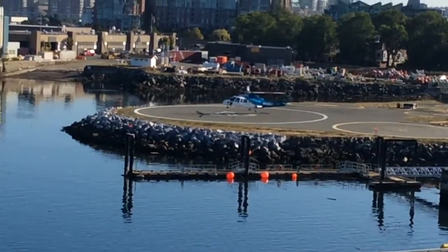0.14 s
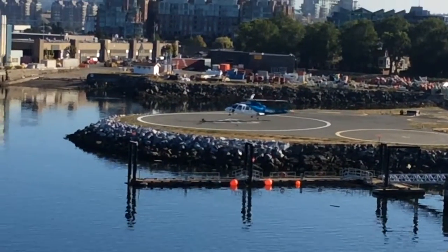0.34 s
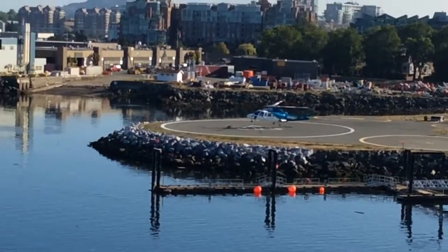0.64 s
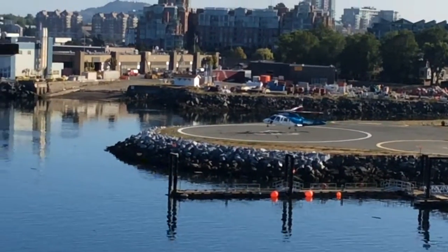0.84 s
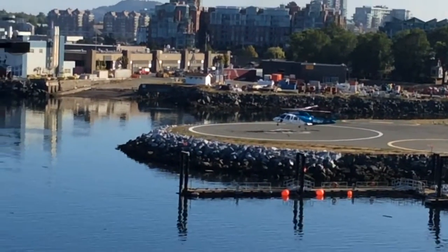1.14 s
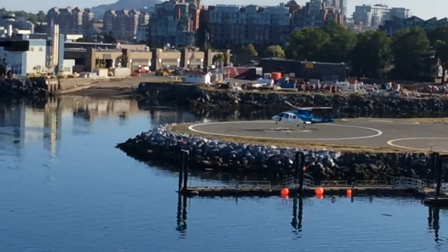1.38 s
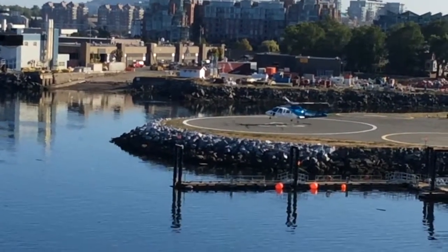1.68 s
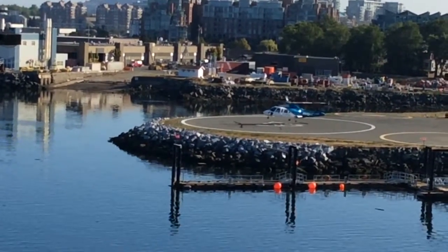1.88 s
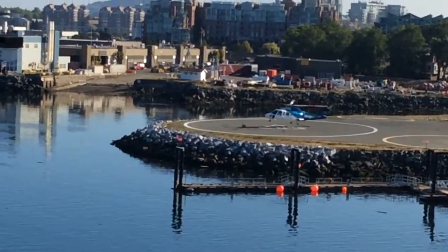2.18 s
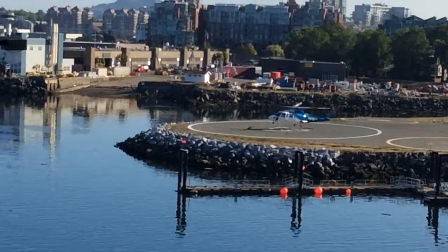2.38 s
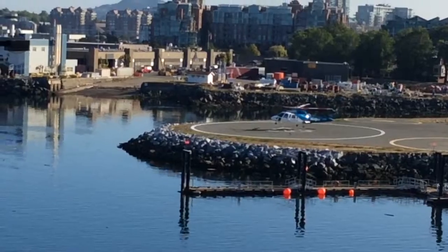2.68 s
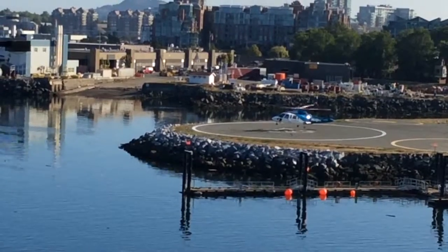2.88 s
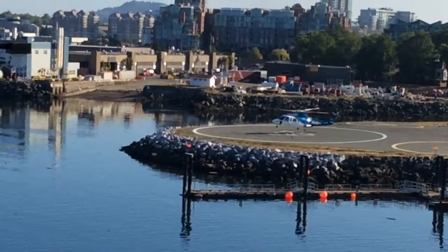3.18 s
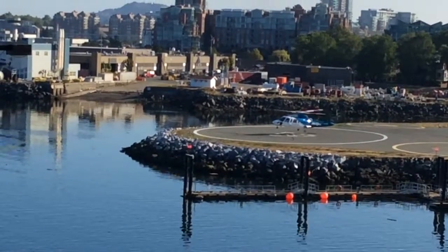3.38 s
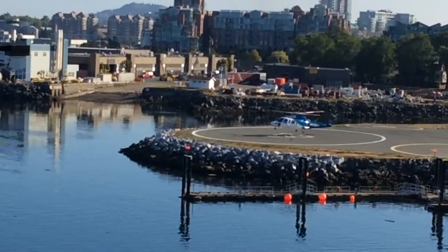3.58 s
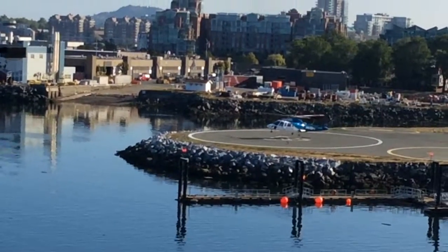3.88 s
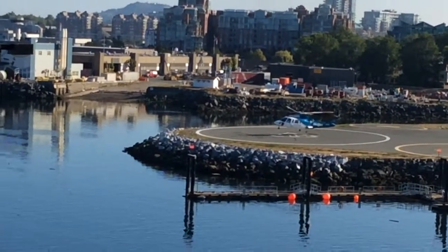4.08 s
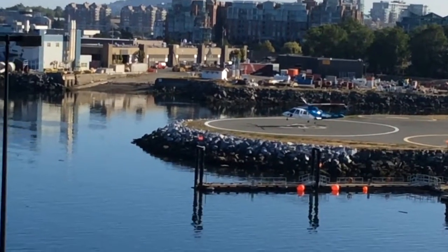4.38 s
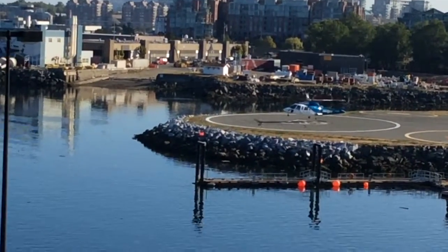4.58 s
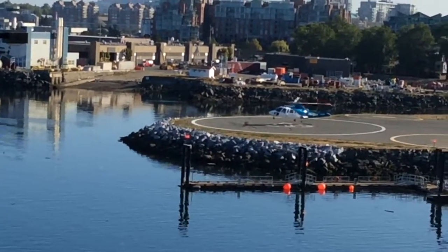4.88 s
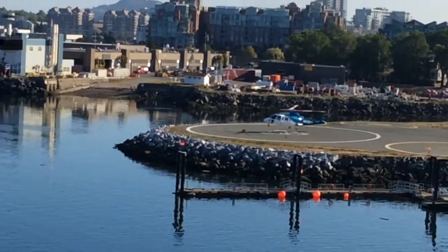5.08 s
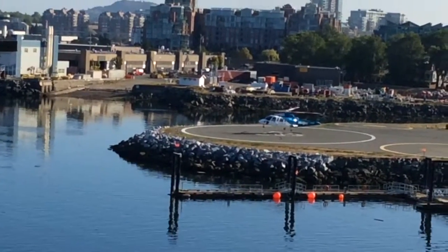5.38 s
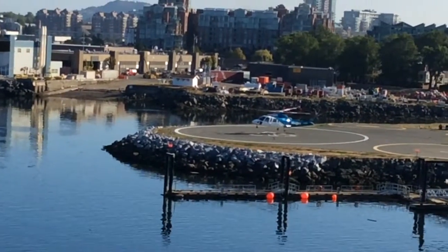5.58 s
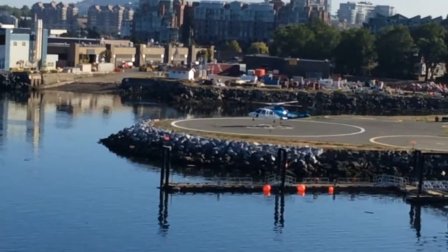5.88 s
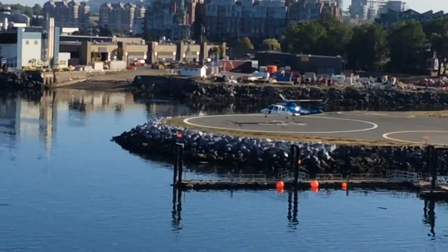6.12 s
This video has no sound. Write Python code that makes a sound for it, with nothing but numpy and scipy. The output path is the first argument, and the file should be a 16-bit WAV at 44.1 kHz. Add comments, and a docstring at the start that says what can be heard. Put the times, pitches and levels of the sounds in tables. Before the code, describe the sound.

A helicopter waits on a pad across a calm harbour, rotors turning steadily for about six seconds, heard outdoors from a distance in mono. A low hum near 107 hertz and its octave waver in level and pitch, roughened by a buzzing rasp and low churning wake. The four main blades pulse a midrange rush and softer hiss into a quick uneven swish, nearly twenty passes a second, repeating about five times a second. The sound is fullest from 0 to 0.6 seconds, then thins around 1; the octave swells again near 2.7, and the rush lifts slightly around 3.4. After 4 it wavers and gradually weakens. Small dull slaps come at about 0.3, 1.1, 2.4 and 2.75, cluster between 4.4 and 4.9, then return faintly at 5.6 and 5.8. Slight reflections colour the rush; a faint, steady town rumble stays behind. It ends still running.

```python
"""On a harbour, across calm water: a helicopter waits on its pad with the rotors turning.
The tail rotor hums on two wavering tones and rasps in the wake of the four main blades.
Those blades pulse bands of noise into a swish, drone faintly and now and then slap in short bursts.
Moving air makes parts of the sound swell and fade; the town is a steady faint rumble of noise behind."""
import sys
import numpy as np
from scipy import signal
from scipy.fft import rfft, irfft, next_fast_len
from scipy.io import wavfile

SR = 44100
rng = np.random.default_rng(int(sys.argv[2]) if len(sys.argv) > 2 else 0)


def file_out(sig):
    """Save sig as 16-bit WAV at sys.argv[1]."""
    # one column per channel
    cols = np.atleast_2d(sig).T
    # limit, then scale
    lim = np.clip(cols, -1, 1)
    pcm = np.round(lim * 32767).astype(np.int16)
    wavfile.write(sys.argv[1], SR, pcm)


N = 275625

MAIN_TURNS_PER_S = 4.905
# The four main blades. Each row: place in the turn (0-1), relative swish strength.
BLADES = [(0.072, 0.59), (0.322, .3), (0.603, 0.94), (.82, 0.61)]
# How the low churn of the wake comes and goes. Each row: time in seconds, level in dB before trim.
CHURN_LEVEL = [(0.0, -42.5), (0.4, -42), (0.57, -48), (0.77, -44.5), (1.1, -50), (1.4, -48), (2.18, -44),
               (2.71, -45), (3.17, -50), (3.33, -45.5), (3.6, -52.5), (4.05, -45.5), (4.6, -51.5),
               (4.83, -42.5), (5.15, -47), (5.7, -48.5), (6.25, -47.5)]
# Spectrum of the body of the rush. Each row: frequency in Hz, relative density in dB per Hz.
BODY_COLOUR = [(380, -22), (490, -9.5), (518, 2), (555, 2.5), (595, 5.5), (625, -5), (660, -1.5), (730, 3),
               (800, -1), (845, -1.5), (915, -1), (1100, -8), (1300, -10.5), (2200, -46)]
# Spectrum of the hiss of the rush. Each row: frequency in Hz, relative density in dB per Hz.
HISS_COLOUR = [(700, -19), (1300, 0), (1480, 2.5), (1570, 0), (1750, 2.5), (2450, 2.5), (2650, -4),
               (2880, -10.5), (3650, -16), (4400, -13.5), (5400, -24.5), (6500, -37.5), (8000, -47.5),
               (11000, -54.5)]


def from_db(db):
    """Decibels to gain."""
    return 10 ** (np.asarray(db) / 20)


def rms_one(x):
    """Scale to rms 1."""
    return x / np.sqrt(np.mean(x ** 2) + 1e-20)


def in_time(rows):
    """Each column of a curve table at every sample."""
    seconds, *columns = np.transpose(rows)
    return [np.interp(np.arange(N) / SR, seconds, column) for column in columns]


def drift(rate):
    """Slow chance of rms about 1, changing about rate times a second."""
    step = 40   # samples between the slow values
    pole = np.exp(-2 * np.pi * rate * step / SR)
    chance = rng.standard_normal(N // step + 2002)
    slow = signal.lfilter([1], [1, -2 * pole, pole * pole], chance)[2000:]   # drop the filter's start
    return np.interp(np.arange(N) / step, np.arange(len(slow)), rms_one(slow))


def noise(colour):
    """Noise of rms 1 with the given spectrum, silent above its last point."""
    size = next_fast_len(N)
    hz, db = np.transpose(colour)
    bins = np.maximum(np.fft.rfftfreq(size, 1 / SR), 1)
    gain = from_db(np.interp(np.log(bins), np.log(hz), db)) * (bins < hz[-1])
    white = rfft(rng.standard_normal(size))
    return rms_one(irfft(white * gain, size)[:N])


def fading(colour, depth_db, rate, count=3):
    """Noise whose neighbouring half-octave bands fade separately, as through turbulent air."""
    size = next_fast_len(N)
    spectrum, out = rfft(noise(colour), size), 0
    half_octaves = 2 * np.log2(np.maximum(np.fft.rfftfreq(size, 1 / SR), 1))
    for k in range(count):   # every count-th band shares one fade
        share = np.maximum(1 - abs((half_octaves - k) % count - 1), 0)
        band = irfft(spectrum * share, size)[:N]
        out = out + band * from_db(depth_db * drift(rate))
    return rms_one(out)


def scattered_paths(scatter, rate, cross_rate):
    """Direct and scattered sound interfere: a complex gain with brief dips but no tall peaks."""
    paths = 1 + scatter * (drift(rate) + 1j * drift(cross_rate))
    return paths / np.sqrt(1 + abs(paths) ** 2)


def flutter(scatter):
    """The interference of direct and scattered sound, scaled to rms 1."""
    paths = scattered_paths(scatter, rate=6.2, cross_rate=6.2)
    return paths / np.sqrt(np.mean(abs(paths) ** 2))


def harbour(x):
    """Reflections from water, rocks and quay ripple the rush; its power stays nearly the same."""
    # Each row: delay in seconds, gain against the direct sound.
    reflections = [(.0046, 0.14), (.0091, 0.14), (.0175, 0.15), (.031, 0.17)]
    at = np.arange(N)
    echoes = sum(gain * np.interp(at - delay * SR, at, x, left=0) for delay, gain in reflections)
    return (x + echoes) / np.sqrt(1 + sum(gain ** 2 for _, gain in reflections))


def tail_blade_angle():
    """Phase in radians of the passing tail blades, from their gliding rate."""
    # Each row: time in seconds, tail rotor blade rate in Hz.
    blade_rate = [(0.0, 106.9), (1.7, 107.9), (6.25, 108.6)]
    return 2 * np.pi * np.cumsum(in_time(blade_rate)[0]) / SR


def blade_swish(turns, width, uneven_db):
    """A surge of turbulence as each main blade sweeps toward the listener, never twice the same."""
    surges = 0
    for place, strength in BLADES:
        from_crest = (turns - place + .5) % 1 - .5   # in turns
        surges = surges + strength * np.exp(-.5 * (from_crest / width) ** 2)
    return surges * from_db(uneven_db * drift(5))


def tail_hum(angle, turns, first_db, octave_db, wander, sway):
    """Two clean overtones; the air shifts their level and phase and each main rotor turn sways them."""
    # The fundamental, sinking slowly. Each row: time in seconds, level in dB before throb and trim.
    first_level = [(0.0, -38.5), (0.46, -34), (0.81, -41.5), (1.45, -39.5), (1.97, -38), (2.88, -41.0),
                   (3.71, -41.5), (3.84, -40.0), (4.86, -42.5), (5.33, -42), (5.75, -45.0), (6.25, -45)]
    # The octave, swelling and fading on its way over the water.
    # Each row: time in seconds, level in dB before throb and trim.
    octave_level = [(0.0, -50), (0.14, -31), (0.51, -37.5), (0.97, -39.5), (1.07, -52.5), (1.44, -38.0),
                    (2.08, -46), (2.11, -38.5), (2.45, -53), (2.5, -40.5), (2.69, -34), (2.78, -42.5),
                    (3.68, -39), (3.82, -51), (3.92, -36.5), (4.4, -38.5), (4.42, -44), (4.9, -38.5),
                    (5.01, -45), (5.29, -36.5), (5.43, -51.0), (5.79, -37), (5.86, -49.0), (6.25, -41.5)]
    # each throbs 1.5 dB up and down once a turn, cresting 0.4 and 0.6 of the way round
    first = in_time(first_level)[0] + 1.5 * np.cos(2 * np.pi * (turns - 0.4))
    octave = in_time(octave_level)[0] + 1.5 * np.cos(2 * np.pi * (turns - 0.6))
    wobble = sway * np.sin(2 * np.pi * turns)
    first_phase = angle + 0.083 * wobble
    octave_phase = 2 * angle + wobble + wander * drift(4.3)
    low = from_db(first + first_db) * flutter(0.17) * np.exp(1j * first_phase)
    high = from_db(octave + octave_db) * flutter(0.43) * np.exp(1j * octave_phase)
    return -np.sqrt(2) * np.real(low + high)


def wake_rasp(swish, trim_low_db, trim_high_db, jitter, scatter):
    """Tail blades meet drifting vortices at uneven moments, which smears their overtones into humps."""
    # Each row: multiple of the rasp rate, relative level in dB.
    overtones = [(1, -7.5), (2, -13.5), (3, -2.5), (4, -17), (5, -6), (6, -12), (7, -14), (8, -12),
                 (9, -16), (10, -16.5), (12, -30)]
    # The upper overtones. Each row: time in seconds, level in dB before trim.
    upper_level = [(0.0, -50.5), (1.62, -56.5), (2.75, -49), (3.0, -51), (4.21, -56.5), (4.44, -51),
                   (4.96, -54.0), (5.9, -52.5), (6.25, -56)]
    low_db = in_time(CHURN_LEVEL)[0] + trim_low_db
    high_db = in_time(upper_level)[0] + trim_high_db
    rasp_hz = 113.55
    angle = 2 * np.pi * rasp_hz * np.arange(N) / SR + jitter * drift(4.9)
    out = 0
    for multiple, db in overtones:
        paths = scattered_paths(scatter, rate=17.0, cross_rate=13.8)
        tone = rms_one(np.real(np.exp(1j * round(multiple) * angle) * paths))
        carried_db = low_db if round(multiple) <= 3 else high_db   # the lowest three follow the churn
        out = out + from_db(db + carried_db) * tone
    return out * rms_one(1 + .5 * swish)


def wake_churn(swish, trim_db):
    """Low noise of the wake, lightly pulsed by the main blades."""
    # Each row: frequency in Hz, relative density in dB per Hz.
    churn_colour = [(25, -23.5), (42, -13.5), (65, -4), (95, -3.5), (135, -7.5), (200, 4), (265, 3.5),
                    (298, -1), (325, 11), (360, -1.5), (398, -15.5), (435, 2), (475, -8), (620, -33.5)]
    level = from_db(in_time(CHURN_LEVEL)[0] + trim_db)
    return level * noise(churn_colour) * rms_one(1 + 0.11 * swish)


def rush_of_air(tail_angle, swish, body_trim_db, hiss_trim_db):
    """Turbulent body and hiss, pulsed by both rotors' blades and carried unevenly by the air."""
    # How well the air carries the rush.
    # Each row: time in seconds, body level in dB before trim, hiss level in dB before trim.
    carry = [(0.0, -47, -54), (0.38, -45.5, -54), (0.63, -51, -57), (1.02, -53.5, -58.5), (1.19, -54, -60),
             (1.43, -51.5, -58), (2.07, -51.5, -57), (2.29, -49.5, -55.5), (2.54, -51.5, -57),
             (2.91, -50.5, -56.0), (3.11, -51.5, -57.0), (3.39, -48.5, -56.0), (4.26, -54.0, -59),
             (4.45, -51.5, -57), (4.65, -52, -60), (5.25, -52.0, -58.5), (5.44, -54.5, -58),
             (6.25, -54, -59.5)]
    body_db, hiss_db = in_time(carry)
    chop = 1 + 0.062 * np.cos(tail_angle)   # a pulse with each tail blade
    eddies = from_db(1.3 * drift(34))   # a flutter with the eddies of the wake
    body = harbour(fading(BODY_COLOUR, depth_db=2.0, rate=8.3))
    hiss = harbour(fading(HISS_COLOUR, depth_db=1.15, rate=9.7))
    body_pulse = rms_one(chop * eddies * (1 + 0.72 * swish))
    hiss_pulse = rms_one(chop * eddies * (1 + 0.35 * swish))
    return (from_db(body_db + body_trim_db) * body * body_pulse
            + from_db(hiss_db + hiss_trim_db) * hiss * hiss_pulse)


def main_drone(turns, level_db, fade_db):
    """Faint overtones of the main blade rate, each fading by itself."""
    # Each row: multiple of the main blade rate, level in dB before fading and trim.
    overtones = [(4, -64.5), (5, -64.5), (8, -63.5), (12, -59), (14, -59.5), (21, -63), (22, -70.5),
                 (25, -61.5)]
    angle = 2 * np.pi * len(BLADES) * turns
    out = 0
    for multiple, db in overtones:
        level = from_db(db + level_db + fade_db * drift(4.4))
        out = out + level * np.cos(round(multiple) * angle + 2 * np.pi * rng.random())
    return np.sqrt(2) * out


def far_town(level_db):
    """Steady noise, strongest in the low rumble, from behind the harbour."""
    # Each row: frequency in Hz, relative density in dB per Hz.
    town_colour = [(12, 14), (40, 31), (65, 38), (120, 31), (500, 24), (2000, 8), (6500, -3), (8000, -4),
                   (11000, -8), (14000, -11), (15500, -14)]
    return from_db(level_db) * noise(town_colour)


def blade_slaps(level_db, decay_s, low_hz, high_hz):
    """A blade cutting a tip vortex gives a short thud and crack, dulled by the distance."""
    # Each row: start in seconds, starting level in dB before trim and band filter,
    # crack against thud in dB.
    slaps = [(0.308, -36, -16), (1.127, -43, -2), (2.364, -40, -0.5), (2.389, -41, -11), (2.753, -39, -12),
             (4.436, -44.5, 11), (4.591, -40.5, -17), (4.752, -46, 20), (4.795, -42.5, -11),
             (4.853, -39.5, -11), (5.638, -49, -20), (5.835, -42, -14)]
    t = np.arange(N) / SR
    thud, crack = noise(BODY_COLOUR), noise(HISS_COLOUR)
    bursts = 0
    for start, db, crack_db in slaps:
        decay = (t >= start) * np.exp(-abs(t - start) / decay_s)
        bursts = bursts + from_db(db + level_db) * decay * rms_one(thud + from_db(crack_db) * crack)
    band = signal.butter(4, [low_hz, high_hz], "band", fs=SR, output="sos")
    return signal.sosfilt(band, bursts)


def scene():
    """Both rotors, their rush of air and the town, in one channel."""
    turns = MAIN_TURNS_PER_S * np.arange(N) / SR
    tail_angle = tail_blade_angle()
    swish = blade_swish(turns, width=0.063, uneven_db=2.5)
    # wander and sway are phase shifts in radians
    hum = tail_hum(tail_angle, turns, first_db=-0.07, octave_db=0.12, wander=0.3, sway=0.3)
    rasp = wake_rasp(swish, trim_low_db=-2.5, trim_high_db=3, jitter=0.43, scatter=0.98)
    churn = wake_churn(swish, trim_db=-0.5)
    rush = rush_of_air(tail_angle, swish, body_trim_db=1.0, hiss_trim_db=0.37)
    drone = main_drone(turns, level_db=-1.0, fade_db=4.5)
    town = far_town(level_db=-60.2)
    slaps = blade_slaps(level_db=0.5, decay_s=.005, low_hz=348, high_hz=2690)
    return (hum + rasp + churn + rush + drone + town + slaps)[None]


def record(dry):
    """One microphone channel, its top cut steeply above 15.1 kHz."""
    low_pass = signal.ellip(10, .1, 80, 15100, fs=SR, output="sos")
    return signal.sosfilt(low_pass, dry)


dry = scene()
out = record(dry)
file_out(out)
```